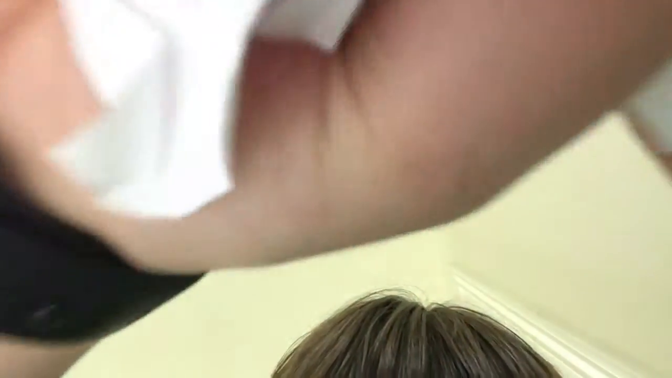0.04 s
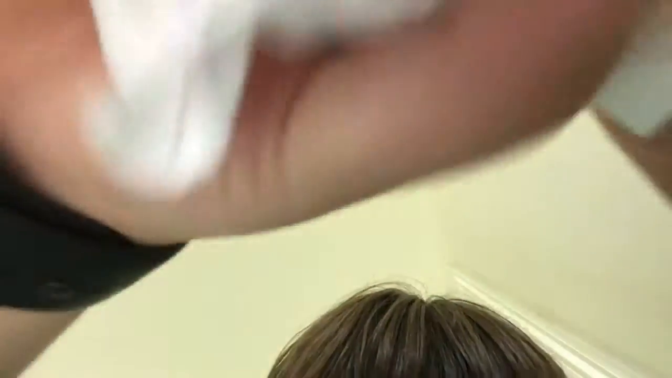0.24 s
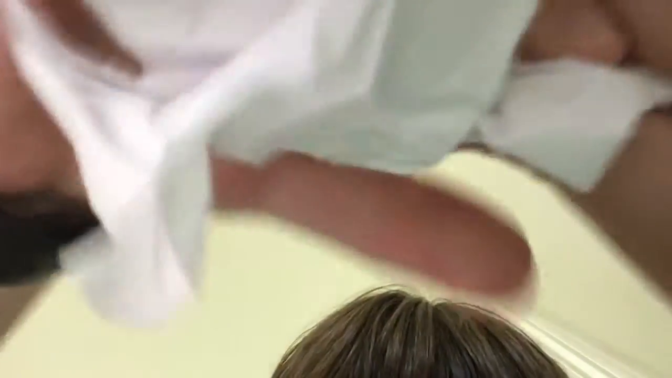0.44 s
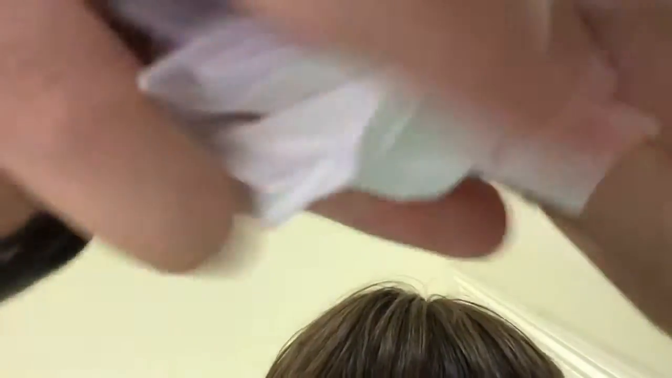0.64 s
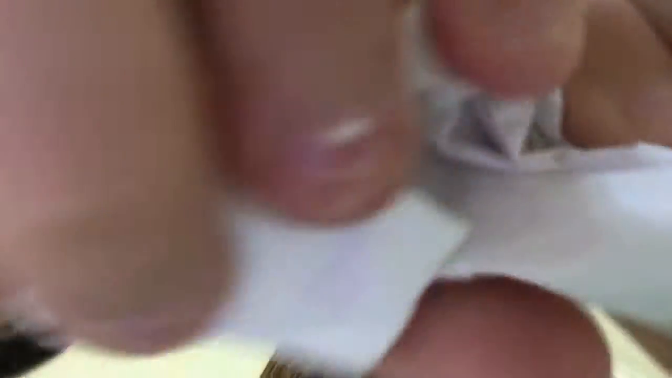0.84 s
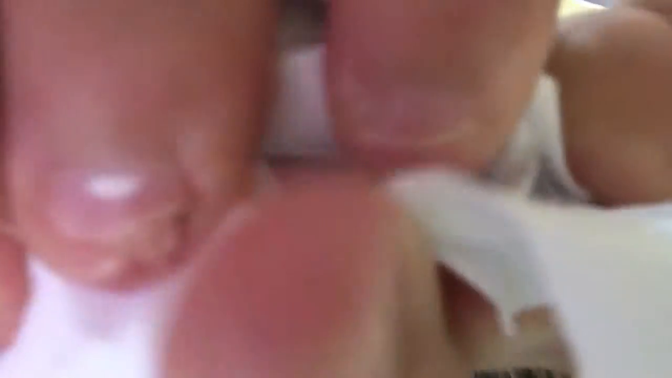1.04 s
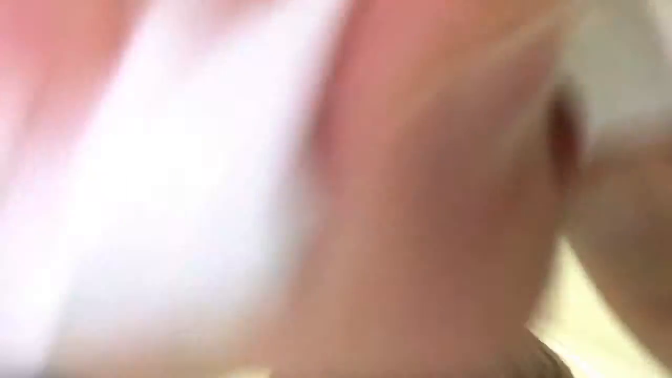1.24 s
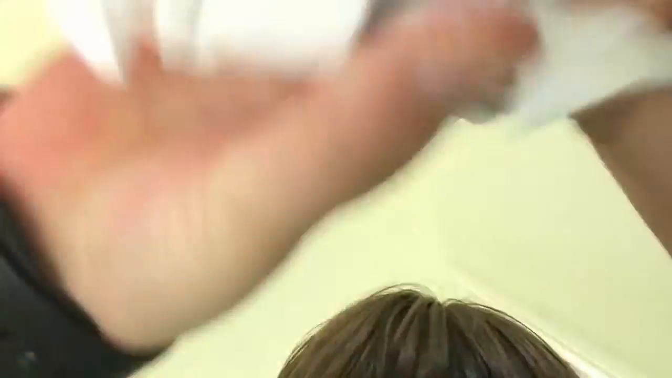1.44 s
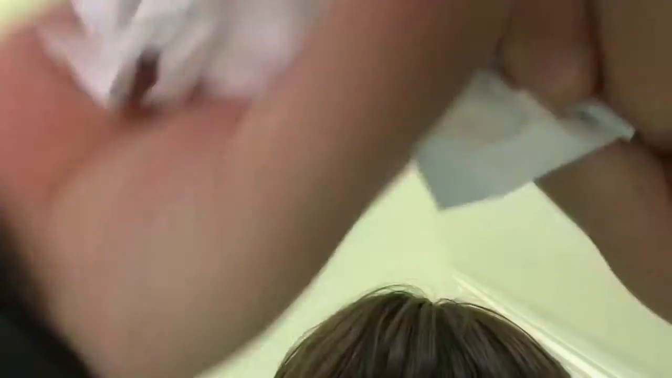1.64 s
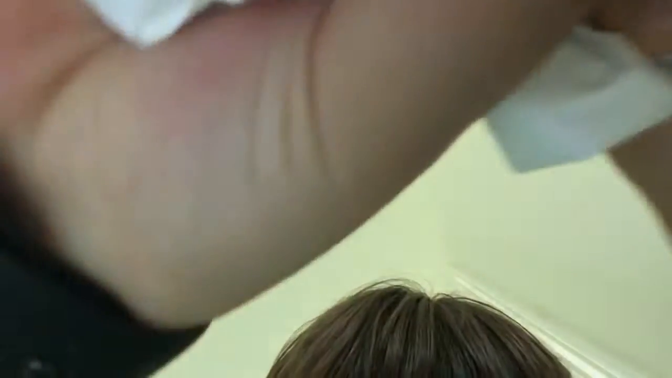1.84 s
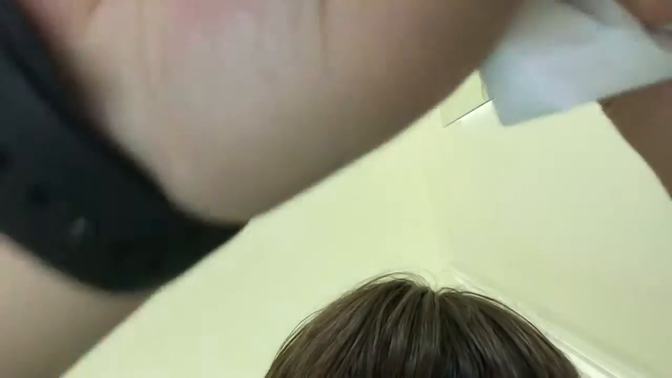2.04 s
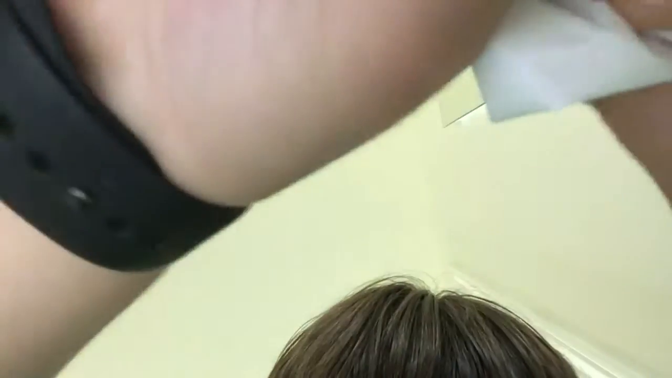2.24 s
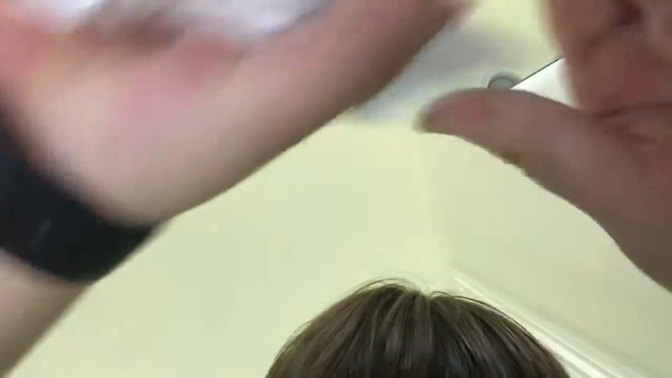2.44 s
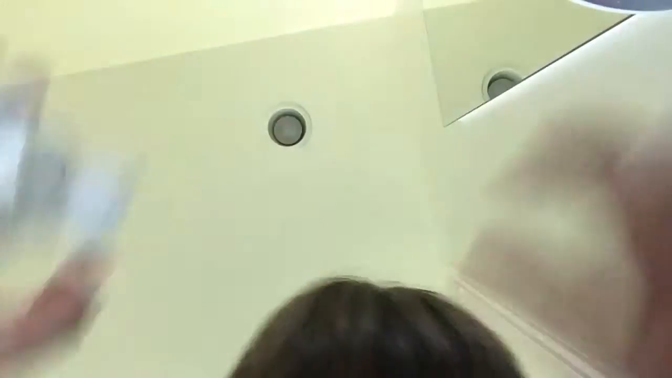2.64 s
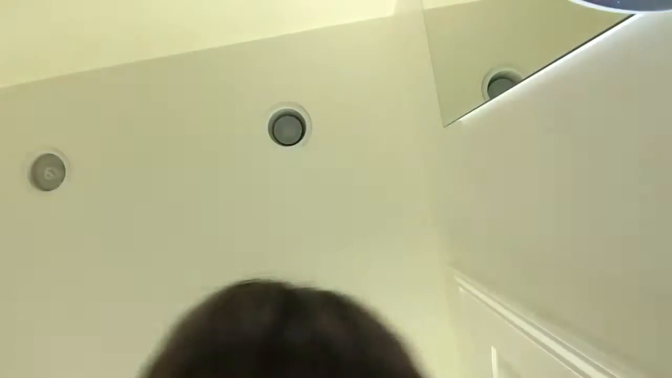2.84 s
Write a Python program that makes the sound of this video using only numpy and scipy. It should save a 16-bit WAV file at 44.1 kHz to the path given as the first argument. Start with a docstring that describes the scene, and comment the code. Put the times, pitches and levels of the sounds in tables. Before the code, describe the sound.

Paper is crumpled by hand close to the microphone in a small room. A light rustle grows into crackles and soft thumps at about 0.3 to 0.6 seconds. The paper slides hissing over skin around 0.9, with a sharp snap at 1.1. A dense crunch comes near 1.5, then lighter crinkling. After a near pause around 2.2, a last squeeze crackles from 2.4 to 2.7 and thins out.

```python
"""A sheet of printer paper is crumpled in the hands right at the microphone, in a small hard room.
Each squeeze stores elastic energy that buckling creases release as sharp snaps over a fine crackle,
while panels of the wad give way and push air in soft thumps. Between squeezes the paper slides on skin
with a grainy stick-slip hiss. The rolling wad rumbles, and the room reverberates over a faint tone."""
import sys
import numpy as np
from scipy import signal
from scipy.fft import rfft, irfft
from scipy.io import wavfile
from scipy.ndimage import uniform_filter1d

SR = 44100
rng = np.random.default_rng(int(sys.argv[2]) if len(sys.argv) > 2 else 0)


def waveform_to_disk(signal):
    """Save audio, clipped to [-1, 1], as 16-bit WAV at the path in sys.argv[1]."""
    frames = np.transpose(np.atleast_2d(signal))
    scaled = np.clip(frames, -1, 1) * 32767
    samples = np.round(scaled).astype(np.int16)
    wavfile.write(sys.argv[1], SR, samples)


N = 127890
TIME = np.arange(N) / SR

# Buckling creases: start_s, level_db, pitch_hz, length_ms
CREASE_SNAPS = [(0.059, -40.1, 4330.0, 1.3), (0.198, -46.4, 3890.0, 1.5), (0.2256, -44.2, 5180.0, 1.0),
                (0.2302, -30.1, 5080.0, 0.9), (0.2361, -44.8, 4710.0, 1.4), (0.2568, -35, 4120.0, 2),
                (0.2755, -35.9, 4400.0, 1.3), (0.3025, -31.7, 3320.0, 1.5), (0.3077, -21.4, 4110.0, 1.3),
                (0.324, -29.7, 2140.0, 1.4), (0.326, -36.0, 650.0, 2.5), (0.3468, -29.0, 3390.0, 2.0),
                (0.3614, -29.9, 3490.0, 1.7), (0.3775, -29.2, 3560.0, 1.4), (0.3914, -42.0, 3880.0, 2.0),
                (0.4495, -44.9, 2510.0, 1.6), (0.4695, -24.3, 2960.0, 2.3), (0.4708, -31.0, 900.0, 2.0),
                (0.4838, -26.6, 2200.0, 2.2), (0.4855, -29.0, 600.0, 2.5), (0.5785, -32.3, 2660.0, 2.3),
                (0.6884, -46.2, 2640.0, 2.1), (0.7214, -36.7, 4830.0, 1.5), (0.786, -32.1, 4230.0, 3.1),
                (0.8118, -35.0, 4570.0, 2.5), (0.8917, -28.1, 2920.0, 1.5), (0.9135, -37.0, 620.0, 2.5),
                (1.0833, -36.1, 2800.0, 2.5), (1.0884, -14.8, 2080.0, 1.1), (1.13, -26.6, 2430.0, 1.2),
                (1.2745, -55.6, 5000.0, 1.0), (1.2914, -51.0, 2420.0, 1.2), (1.3251, -42.5, 3630.0, 1.0),
                (1.3614, -40.6, 4400.0, 1.2), (1.4042, -26.5, 3010.0, 2.0), (1.4207, -27.5, 4030.0, 2.4),
                (1.4284, -29.8, 3710.0, 1.7), (1.4438, -29.1, 3370.0, 2.9), (1.4572, -28.0, 2990.0, 2.8),
                (1.4751, -28.5, 2610.0, 1.3), (1.4863, -24.4, 2790.0, 1.5), (1.5121, -29.8, 3140.0, 2.1),
                (1.5316, -31.4, 3140.0, 2.8), (1.535, -33.3, 3730.0, 2.6), (1.635, -40.0, 3200.0, 5.0),
                (1.8105, -21.8, 3010.0, 0.6), (1.8141, -31.4, 4040.0, 1.0), (1.8322, -23.9, 2510.0, 1.1),
                (1.9224, -32.4, 4060.0, 2.5), (2.034, -43.1, 4130.0, 0.8), (2.0959, -35.5, 3600.0, 0.9),
                (2.1121, -47.0, 5250.0, 0.7), (2.329, -59, 5000.0, 1.2), (2.342, -59, 5000.0, 1.2),
                (2.357, -57, 5000.0, 1.2), (2.3856, -33.8, 5400.0, 1.8), (2.4075, -42.7, 4890.0, 1.2),
                (2.4184, -37.8, 3720.0, 1.8), (2.4414, -33.7, 3370.0, 2.1), (2.4466, -33.1, 3910.0, 1.8),
                (2.4527, -30.8, 4110.0, 1.6), (2.4778, -35.6, 4000.0, 2.1), (2.488, -40.4, 4000.0, 1.5),
                (2.5044, -32.8, 3540.0, 1.8), (2.5424, -34.2, 4230.0, 2.1), (2.5489, -33.7, 3510.0, 2.5),
                (2.6033, -33.8, 3240.0, 1.5), (2.6135, -36.8, 4500.0, 2.0), (2.6208, -41.7, 3300.0, 1.2),
                (2.648, -38.6, 4020.0, 1.6), (2.7909, -42.1, 4940.0, 2.2), (2.8171, -42.5, 2900.0, 1.7),
                (2.8498, -34.7, 2260.0, 2.3)]
# Spectrum of one snap about its centre pitch: pitch_ratio, gain_db
SNAP_SPECTRUM = [(.08, -50.5), (.27, -15.5), (.5, -6), (.85, 3), (1.35, -3.5), (2, -8.5), (3, -21),
                 (5, -35), (8, -50)]
# Squeezing effort, as loudness of the crackle: time_s, level_db
SQUEEZE_EFFORT = [(0, -50), (.10, -58), (.16, -78), (.22, -54.5), (.27, -47), (.31, -39), (.365, -35.5),
                  (.40, -48.5), (.45, -57.5), (.49, -40.5), (.55, -61), (.58, -36.5), (.61, -53),
                  (.66, -60.5), (.71, -42.5), (.75, -51.5), (.80, -45.5), (.90, -43), (1.06, -55.5),
                  (1.10, -44), (1.14, -40.5), (1.18, -68), (1.29, -70), (1.34, -51), (1.39, -43.5),
                  (1.44, -31), (1.475, -33.5), (1.50, -38), (1.56, -45), (1.595, -56.5), (1.635, -43.5),
                  (1.67, -60), (1.76, -52), (1.81, -44), (1.92, -56.5), (2.04, -60), (2.14, -63.5),
                  (2.25, -80.5), (2.36, -72), (2.40, -57.5), (2.45, -42), (2.51, -47), (2.55, -42),
                  (2.58, -46.5), (2.61, -40.5), (2.65, -51.5), (2.72, -61), (2.78, -69.5), (2.82, -50),
                  (2.9, -63)]
# Spectrum of the tiny creases: frequency_hz, gain_db
CRACKLE_SPECTRUM = [(50, -42), (200, -6.5), (500, -10), (750, -5), (1050, -13), (1600, -4), (2400, 0.5),
                    (3600, -12), (6000, -10.5), (9000, -20.5), (15500, -28)]
# Paper sliding on skin: time_s, level_db, tilt_db (positive is brighter)
SLIDE_STROKES = [(0, -49, 0), (.08, -46.5, -2), (.15, -71, -5), (.25, -46.5, -0.5), (.30, -51.5, 8),
                 (.36, -39.5, 1.5), (.41, -61.5, 0), (.52, -42, 0.5), (.66, -65.5, -4), (.76, -63.5, 6.5),
                 (.79, -40, 2), (.85, -36.5, 0.5), (.91, -34, 0), (.955, -39.5, -1), (1.01, -36, 0.5),
                 (1.055, -45, 5.5), (1.075, -47, -1), (1.20, -54.5, -3), (1.24, -69, 1), (1.30, -72, -7.5),
                 (1.315, -50, -2), (1.42, -43, 1), (1.56, -60, 6), (1.60, -64.5, 2.5), (1.72, -57, -6),
                 (1.75, -65, -3.5), (1.79, -49, -4), (1.87, -48.5, -3), (1.92, -48, -6.5),
                 (1.98, -40, -2.5), (2.06, -54.5, -0.5), (2.11, -52, 0), (2.15, -65.5, 2), (2.28, -86, 2.5),
                 (2.37, -82.5, 9.5), (2.47, -50.5, 5.5), (2.62, -52, -0.5), (2.72, -63, -2),
                 (2.9, -60.5, -3)]
# Spectrum of the friction: frequency_hz, gain_db
FRICTION_SPECTRUM = [(50, -47), (250, -14), (480, -26), (750, -6.5), (1050, -5), (1500, 2.5), (2400, 1),
                     (3700, 1.5), (5200, 4), (6500, 0.5), (8500, -9.5), (11500, -12), (15500, -22.5)]
# Panels giving way: start_s, peak_db, pitch_hz
PANEL_THUMPS = [(0.325, -28, 244), (0.35, -37, 121), (.367, -39.5, 109), (.4835, -24.5, 274),
                (0.499, -34.5, 108), (.912, -32.5, 197), (1.429, -48, 170), (1.445, -30, 145),
                (1.458, -32.5, 124), (1.475, -62, 100), (1.486, -23, 140), (1.514, -33, 135),
                (1.545, -41.5, 109), (1.625, -53, 71), (2.447, -38.5, 202), (2.478, -30, 178),
                (2.502, -29.5, 157), (2.551, -44, 124)]
# The wad rolling in the hands: time_s, level_db
ROLLING_LEVEL = [(0, -67), (.1, -63.5), (.2, -66.5), (.26, -54), (.37, -63), (.43, -70), (.50, -54),
                 (.60, -59.5), (.67, -66.5), (.79, -55), (.93, -68), (1.0, -65), (1.36, -67), (1.47, -44.5),
                 (1.55, -53), (1.59, -62), (1.68, -63), (1.73, -67), (1.80, -55), (1.9, -68), (2.38, -71),
                 (2.50, -60), (2.66, -56), (2.72, -67.5), (2.9, -58)]
# Spectrum of the flexing wad: frequency_hz, gain_db
RUMBLE_SPECTRUM = [(40, -7.5), (70, -3), (130, -3), (260, -0.5), (380, -3), (550, -14), (1000, -34),
                   (3000, -53.5)]
# Colour of the reverberation: frequency_hz, gain_db
REVERB_SPECTRUM = [(60, 30), (250, 8.5), (500, 1), (1000, 14), (1350, -9), (1700, 9), (2100, -4.5),
                   (2500, 3.5), (3100, 1.5), (6000, -31.5), (9000, -18.5), (15000, -32)]
# Steady background of the room: frequency_hz, gain_db
ROOM_TONE_SPECTRUM = [(25, -27.5), (45, -10), (65, 14), (110, -4.5), (230, -6), (450, -15), (1000, -4.5),
                      (3000, -67.5), (6000, -20.5), (10000, -48.5), (15000, -46)]

CUTOFF_HZ = 15850


def snaps(tear_db=6, ring_db=-2.5, tone_db=-19.5):
    """Buckling: a crease pops amid a run of small fractures, then the sheet and the stiff fold ring."""
    lead_s, rise_s, ring_decay_s, tone_decay_s = .003, .00045, .0032, .0025
    level_window_s = .0045  # level_db is the snap's energy averaged over this span
    out, lead = np.zeros(N), int(lead_s * SR)
    t = np.arange(-lead, SR // 20) / SR
    radius = np.exp(-1 / (tone_decay_s * SR))
    for start_s, level_db, pitch_hz, length_ms in CREASE_SNAPS:
        tear_noise, ring_noise = rng.standard_normal((2, len(t)))
        tear_decay_s = .55 * length_ms / 1000
        fractures = tear_noise * np.exp(np.minimum(t / rise_s, -t / tear_decay_s))
        sheet_ring = ring_noise * (t > 0) * np.exp(-t / ring_decay_s)
        force = from_db(tear_db) * length_ms * energy_one(fractures)  # longer snaps tear more
        force += from_db(ring_db) * energy_one(sheet_ring)
        force[lead] -= 1  # the impulse of the pop itself
        pop = energy_one(colour(force, np.array(SNAP_SPECTRUM) * [pitch_hz, 1]))
        resonance = [1, -2 * radius * np.cos(2 * np.pi * pitch_hz / SR), radius ** 2]
        fold_tone = energy_one(signal.lfilter([1, 0, -1], resonance, pop))
        snap = energy_one(pop + from_db(tone_db) * fold_tone)
        add(out, start_s - lead_s, from_db(level_db) * np.sqrt(level_window_s * SR) * snap)
    return out


def crackle(creases_per_s=1000, decay_s=.0011):
    """Crackling noise: tiny creases give way at random in short bursts, louder under a harder squeeze."""
    effort_db, = in_time(SQUEEZE_EFFORT)
    releases = grains(creases_per_s, spread_db=4.2) ** 2 + 1e-12
    power = signal.lfilter([1], [1, -np.exp(-2 / (decay_s * SR))], releases)
    power /= uniform_filter1d(power, size=1800)  # evened out, so the effort sets the loudness
    bursts = np.sqrt(power) * rng.standard_normal(N)
    return from_db(effort_db) * rms_one(colour(bursts, CRACKLE_SPECTRUM))


def slide(fibres_per_s=9000, judders_per_s=570, judder_db=3.12):
    """Stick-slip friction: fibres catch on skin in dense grains whose brightness follows the stroke."""
    level_db, tilt_db = in_time(SLIDE_STROKES)
    catches = grains(fibres_per_s, spread_db=3.5) * rng.choice([-1, 1], N)
    judder = np.interp(TIME * judders_per_s, np.arange(N), rng.standard_normal(N))
    hiss = rms_one(colour(catches, FRICTION_SPECTRUM))
    lows = signal.sosfilt(signal.butter(1, 3500, fs=SR, output="sos"), hiss)
    tilted = lows * from_db(-2 * tilt_db) + (hiss - lows) * from_db(2 * tilt_db)
    return from_db(level_db + judder_db * judder) * tilted


def thumps(rise_cycles=.45, decay_cycles=.24, pitch_sag=.25):
    """Damped oscillation: a panel swings briefly and pushes air, sinking in pitch as the hand damps it."""
    out, t = np.zeros(N), np.arange(SR // 10) / SR
    for start_s, peak_db, pitch_hz in PANEL_THUMPS:
        cycles = pitch_hz * t
        envelope = np.minimum(cycles / rise_cycles, 1) ** 2 * np.exp(-cycles / decay_cycles)
        swing = envelope * np.sin(2 * np.pi * np.log1p(pitch_sag * cycles) / pitch_sag)
        add(out, start_s, from_db(peak_db) * swing / np.abs(swing).max())
    return out


def rumble():
    """Flexure: the wad radiates low noise as the hands roll it."""
    level_db, = in_time(ROLLING_LEVEL)
    return from_db(level_db) * rms_one(colour(rng.standard_normal(N), RUMBLE_SPECTRUM))


def cupped_hands(x, delays_s=(.000918, .0018, .0031), echo_gain=.12, delay_swing=.17, moves_per_s=9):
    """Comb filtering: short reflections between palms and moving fingers give a wandering colour."""
    out = x.copy()
    for delay_s in delays_s:
        motion = np.interp(TIME * moves_per_s, np.arange(N), rng.uniform(-1.06, 1, N))
        out += echo_gain * np.interp(TIME - delay_s * (1 + delay_swing * motion), TIME, x)
    return out


def reverberation(x, low_t60_s=.74, treble_t60_s=.49, split_hz=3500, onset_s=.0026, gain_db=-26.5):
    """Diffuse reflection: the room returns an exponentially decaying tail whose treble dies first."""
    t = np.arange(SR // 2) / SR
    low_noise, treble_noise = rng.standard_normal((2, len(t)))
    lows = band(low_noise, 75, split_hz) * from_db(-60 * t / low_t60_s)
    treble = band(treble_noise, split_hz, CUTOFF_HZ) * from_db(-60 * t / treble_t60_s)
    tail = energy_one((lows + treble) * np.minimum(t / onset_s, 1))
    return from_db(gain_db) * signal.fftconvolve(x, colour(tail, REVERB_SPECTRUM))[:N]


def room_tone(level_db=-73.5):
    """Stationary noise: a faint, mostly low background fills the room."""
    return from_db(level_db) * rms_one(colour(rng.standard_normal(N), ROOM_TONE_SPECTRUM))


def grains(per_s, spread_db):
    """Poisson process: clicks at independent random times, many small and few large."""
    sizes = from_db(spread_db * np.minimum(rng.exponential(1, N), 3.2))
    return sizes * (rng.random(N) < per_s / SR)


def colour(x, spectrum, size=4096):
    """Minimum-phase filtering: a causal response with the given spectrum."""
    frequency_hz, gain_db = np.transpose(spectrum)
    bins_hz = np.fft.rfftfreq(size, 1 / SR)
    gain = from_db(np.interp(np.log(bins_hz + 1), np.log(frequency_hz), gain_db))
    cepstrum = irfft(np.log(gain))
    cepstrum[1:size // 2] *= 2
    cepstrum[size // 2 + 1:] = 0
    response = irfft(np.exp(rfft(cepstrum)))
    return signal.fftconvolve(x, response)[:len(x)]


def band(x, low_hz, high_hz):
    """Butterworth band-pass filtering."""
    return signal.sosfilt(signal.butter(2, [low_hz, high_hz], "band", fs=SR, output="sos"), x)


def from_db(db):
    """Amplitude ratio of a level in decibels."""
    return 10 ** (np.asarray(db) / 20)


def rms_one(x):
    """Normalisation to unit mean power."""
    return x / np.sqrt(np.mean(x ** 2) + 1e-20)


def energy_one(x):
    """Normalisation to unit energy."""
    return x / np.sqrt(np.sum(x ** 2) + 1e-20)


def in_time(rows):
    """Linear interpolation of a table's columns at every sample."""
    time_s, *columns = np.transpose(rows)
    return [np.interp(TIME, time_s, column) for column in columns]


def add(out, start_s, sound):
    """Superposition of a sound from its start time on."""
    i = max(int(start_s * SR), 0)
    out[i:i + len(sound)] += sound[:max(N - i, 0)]


def scene():
    """Superposition: the direct sound of the paper, its reverberation and the room tone."""
    paper = snaps() + cupped_hands(crackle() + slide()) + thumps() + rumble()
    background = room_tone()
    return (paper + reverberation(paper) + background)[None]


def record(dry, bass_cut_hz=54):
    """Band limiting: the microphone drops the deep bass, and the highest treble is cut."""
    high_pass = signal.butter(5, bass_cut_hz, "high", fs=SR, output="sos")
    low_pass = signal.ellip(10, .2, 70, CUTOFF_HZ, fs=SR, output="sos")
    return signal.sosfilt(low_pass, signal.sosfilt(high_pass, dry))


dry = scene()
out = record(dry)
waveform_to_disk(out)
```